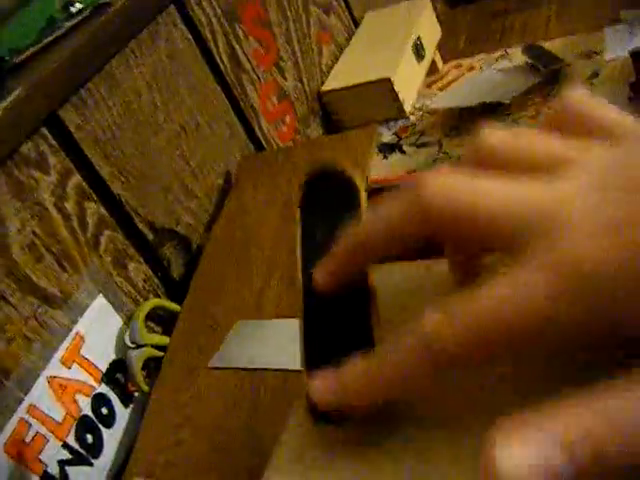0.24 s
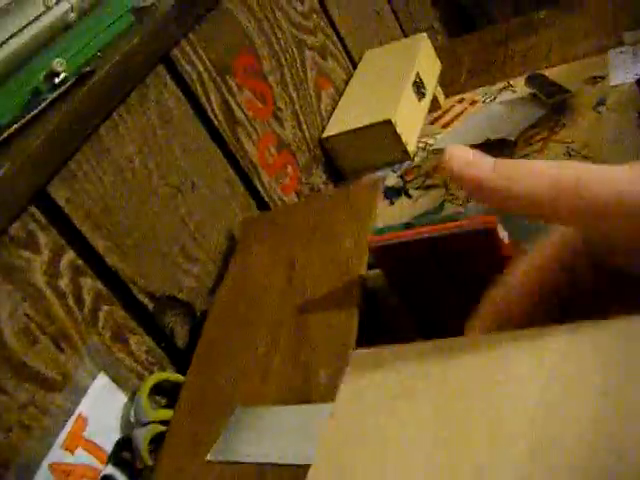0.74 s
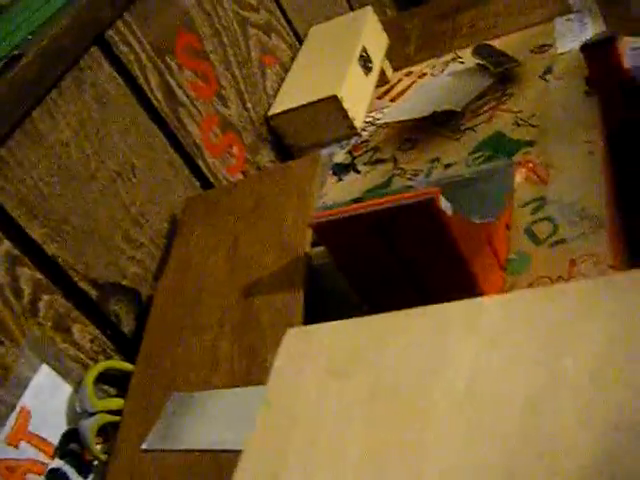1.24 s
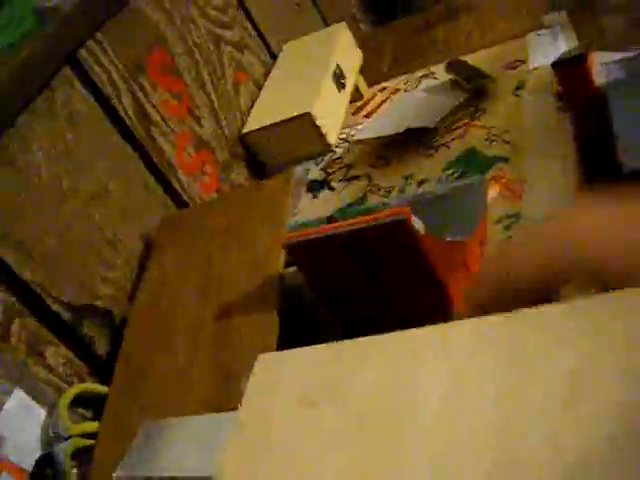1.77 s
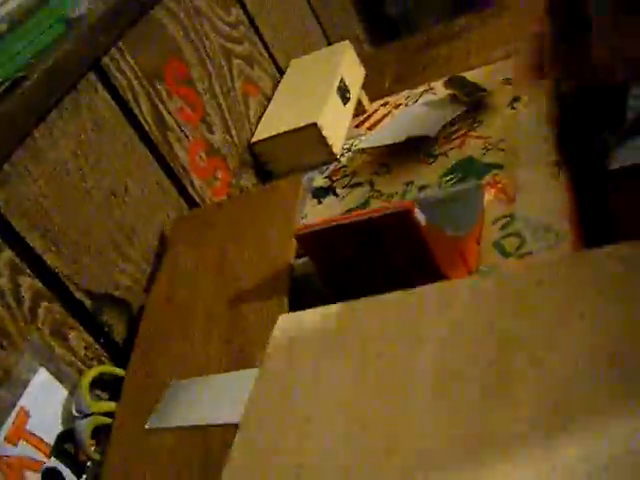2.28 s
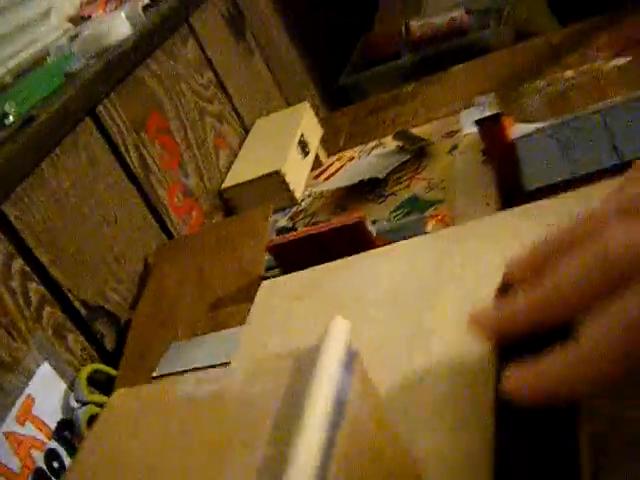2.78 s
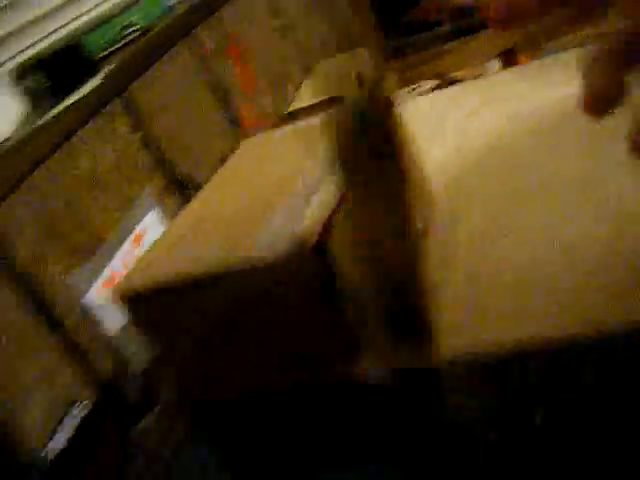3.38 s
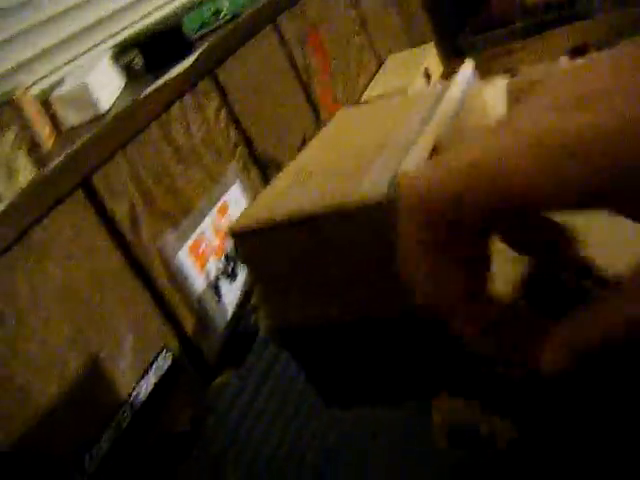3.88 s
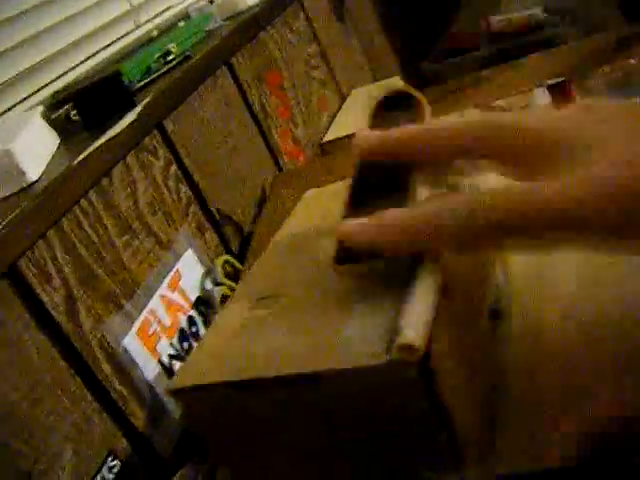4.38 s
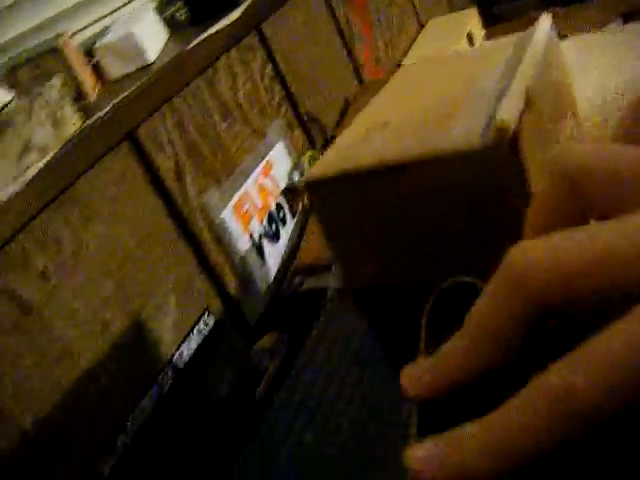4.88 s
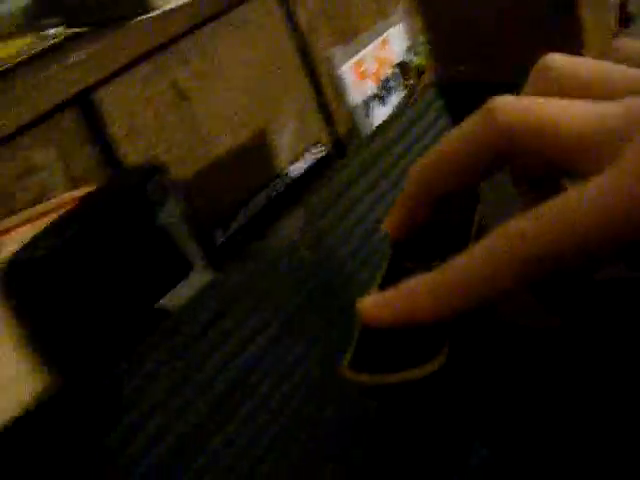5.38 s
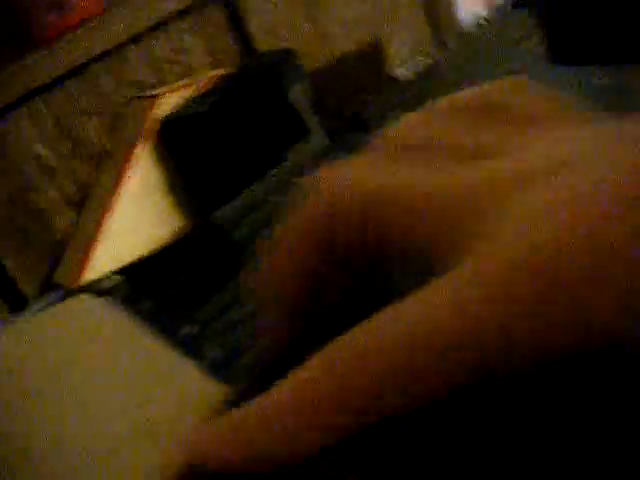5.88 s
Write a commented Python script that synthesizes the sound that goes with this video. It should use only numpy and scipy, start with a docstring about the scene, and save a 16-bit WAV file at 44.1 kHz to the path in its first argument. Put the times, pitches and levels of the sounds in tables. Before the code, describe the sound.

Close to a small camera in a small room, a finger skateboard clacks sharply, then drops and tumbles with a hollow ringing knock. Rattles thin out to near quiet, a swelling wheel rumble follows, then bursts of crisp clacks and skids on wood and box. Finally it rolls over a ribbed mat with a faint wavering tone and fuzzy drone. Hiss and low hum stay underneath.

```python
"""A toy finger skateboard clacks, skids, rolls and scrapes over a wooden table and a ribbed mat in a small room.
Contacts are noise cracks plus dying modes of deck, trucks and wood; a tumble onto a hollow thing rings its modes.
Wheels and rubbing are random grit through resonances; ribs of the mat add a wandering tone and a fuzzy drone.
Steady hiss, a low wavering hum and a thin screen whine lie under it all, close to a small camera."""
import sys
import numpy as np
from scipy import signal
from scipy.fft import rfft, irfft
from scipy.io import wavfile
from scipy.ndimage import uniform_filter1d

SR = 44100
rng = np.random.default_rng(int(sys.argv[2]) if len(sys.argv) > 2 else 0)


def pcm_store(signal):
    """Save signal as 16-bit PCM."""
    levels = np.round(np.clip(np.atleast_2d(signal), -1, 1) * 32767)
    wavfile.write(sys.argv[1], SR, levels.astype(np.int16).T)


N = 270333

# Wheels and board moving: start_s, rumble_db
ROLL_CURVE = [(0.0, -41), (0.23, -45.5), (0.55, -47.5), (0.76, -54), (0.93, -31.5), (1.11, -41.5),
              (1.24, -37.5), (1.69, -49.5), (2.01, -63), (2.53, -56), (2.656, -46.5), (2.722, -34),
              (2.888, -22.5), (3.0, -22), (3.085, -26.5), (3.11, -40.5), (3.3, -62), (4.4, -69),
              (4.498, -35.5), (4.602, -38), (4.66, -63), (4.8, -43), (5.138, -49.5), (5.38, -43.5),
              (5.494, -52), (5.618, -37), (6.026, -38.5), (6.13, -29)]
# Table resonances: centre_hz, width_hz, level_db
TABLE_MODES = [(236.4, 26, 2.5), (360, 47, 6.5), (590, 250, 9), (893, 140, 10), (1298, 260, 9.5),
               (1510, 360, 7)]
# Fingers, grip tape and axles rubbing: start_s, scrape_db, fizz_db
RUB_CURVE = [(0.03, -43, -47), (0.14, -48, -57), (0.3, -58.5, -68), (0.51, -54, -55), (0.74, -41, -41),
             (1.08, -37, -42), (1.25, -55.5, -84), (1.39, -43, -42), (1.77, -58, -83), (1.98, -67, -60),
             (2.12, -56, -53), (2.5, -71, -82), (2.62, -49.5, -49), (2.988, -37.5, -47.5), (3.13, -53, -60),
             (3.246, -44.5, -77), (3.45, -73, -68), (3.64, -62, -63), (3.934, -48, -65), (4.04, -58, -50),
             (4.39, -54, -59), (4.48, -38.5, -41.5), (4.64, -47.5, -43), (4.742, -39, -35),
             (4.962, -49.5, -55), (5.378, -53, -49.5), (5.672, -41, -44), (5.874, -47, -53),
             (6.056, -33.5, -36), (6.13, -50, -57)]
# Board resonances under friction: centre_hz, width_hz, gain_db
BOARD_RESONANCES = [(2300, 34, -40), (2820, 78, 0.5), (3236, 170, -3), (3870, 340, 0), (4370, 125, -0.5),
                    (5190, 770, -0.5), (6200, 1800, -4.5), (10480, 4500, -1), (11960, 840, -1),
                    (14200, 780, -2.5)]
# Background hiss, relative spectrum: frequency_hz, gain_db
HISS_SPECTRUM = [(12, -56.5), (20, -8), (43, 1.5), (101, 2.5), (138, -3.5), (277, -9), (388, -29),
                 (542, -9), (607, -13.5), (738, -17), (923, -17), (1120, -18), (4810, -29), (7950, -33),
                 (16000, -30)]
# Hum bands: centre_hz, width_hz, level_db
HUM_BANDS = [(54, 14, -50), (129, 12, -50), (383, 8, -58)]
# Short skids and chatters: start_s, length_s, thump_db, knock_db, clack_db, tick_db,
# wood_hz, board_hz (dragging part), board_ring_db (within the skid)
SKIDS = [(0.01, 0.17, -40.5, -36, -36.5, -41.5, 258, 3260, 5),
         (0.404, 0.073, -38, -41, -51, -56, 820, 2470, 3),
         (0.512, 0.11, -37.5, -37.5, -54, -55, 796, 2400, -8),
         (0.571, 0.018, -43, -21, -18.5, -36, 247, 2140, 5),
         (0.622, 0.051, -60, -35.5, -35, -33.5, 940, 2140, 6),
         (0.723, 0.036, -27.5, -28.5, -33, -31, 295, 2630, 8),
         (0.769, 0.023, -47, -20.5, -53, -46, 500, 1870, -17),
         (0.825, 0.026, -23.5, -33.5, -40, -33, 410, 2510, 18),
         (0.922, 0.041, -24, -46, -30, -24.5, 567, 2480, 8), (1, 0.037, -17, -14, -24, -21, 1196, 3140, 10),
         (1.037, 0.04, -45, -23, -26.5, -32, 1110, 2770, 3),
         (1.256, 0.025, -32, -27, -31, -33, 870, 4020, 16),
         (2.55, 0.03, -41, -25, -27, -29, 930, 1900, -18), (3.134, 0.01, -30, -33, -54, -44, 616, 2560, -2),
         (3.177, 0.053, -49, -36, -33, -36, 368, 1960, 13),
         (3.5, 0.13, -51, -33, -29, -27.5, 430, 2120, 11.5),
         (3.602, 0.062, -49, -48, -35, -40, 1130, 2130, 14),
         (3.633, 0.14, -57, -57, -45.5, -49, 1100, 2140, 9),
         (3.775, 0.033, -58, -43, -36, -36, 567, 2120, 13),
         (3.913, 0.076, -45, -40.5, -33, -37, 1210, 5130, 5),
         (4.416, 0.048, -21, -55, -27.5, -24.5, 710, 2540, -5),
         (4.588, 0.017, -31.5, -48, -39, -44, 776, 3000, 3),
         (4.774, 0.075, -58, -35, -51, -40, 1180, 2040, 11),
         (4.879, 0.051, -64, -29, -28, -31, 850, 2010, 3),
         (5.208, 0.08, -45, -36.5, -33, -28.5, 990, 2520, 7),
         (5.845, 0.022, -29.5, -31, -28.5, -27, 448, 3100, 8),
         (5.884, 0.058, -43, -34, -32, -43, 507, 3760, 22),
         (5.94, 0.071, -32.5, -30.5, -51, -56, 565, 3460, 11),
         (6.006, 0.032, -29, -22.5, -51, -54, 820, 1790, 2)]
# Clacks of the board: start_s, thump_db, knock_db, clack_db, tick_db,
# wood_hz (struck wood), touch_hz (touched part of the board), rattle_t60_s
CLACKS = [(0.011, -20, -12, -8.5, -5.5, 1340, 3500, 0.023),
          (0.571, -21.5, -24, -15, -10.5, 237, 5800, 0.069), (0.704, -62, -60, -38, -24, 277, 4630, 0.031),
          (0.744, -40, -27, -21, -35, 547, 3700, 0.072), (0.761, -9, -13, -19.5, -15.5, 506, 1750, 0.014),
          (0.774, -30, -40, -28.5, -45, 415, 2640, 0.1), (0.905, -17, -12, -37, -34, 570, 1570, 0.0095),
          (0.935, -20.5, -21.5, -27, -40, 650, 4480, 0.018),
          (0.961, -30, -37, -30.5, -25.5, 460, 4540, 0.11), (1.008, -21.5, -26, -21, -27, 538, 4240, 0.046),
          (1.012, -38, -20.5, -43, -38, 1086, 1690, 0.091), (1.021, -17, -25, -23, -25, 470, 1690, 0.012),
          (1.044, -31, -41, -36, -30, 460, 3600, 0.042), (1.053, -23, -39, -37, -22, 462, 2880, 0.037),
          (1.122, -35, -41, -37.5, -29, 460, 3650, 0.047), (1.163, -30, -28, -36.5, -35, 506, 3700, 0.056),
          (1.196, -46, -39, -35.5, -35, 400, 3750, 0.12), (1.262, -36, -22.5, -32.5, -47, 1390, 3700, 0.12),
          (1.31, -29, -25.5, -31, -32, 924, 4430, 0.056), (1.343, -25, -26, -35, -33, 1012, 4640, 0.049),
          (1.361, -19, -14, -20.5, -25.5, 723, 1560, 0.033),
          (1.456, -30.5, -27.5, -29.5, -28.5, 235, 4200, 0.073),
          (1.573, -35, -28, -37, -33, 1480, 4000, 0.18), (1.635, -47, -39, -37.5, -40, 1370, 4100, 0.11),
          (1.661, -37, -35, -44, -46, 1442, 3800, 0.14), (1.788, -64, -45, -47, -48, 391, 3160, 0.14),
          (1.978, -47, -44, -32.5, -24, 223, 4610, 0.14), (2.046, -57, -73, -44, -40, 375, 4770, 0.13),
          (2.063, -66, -60, -37, -31.5, 395, 4730, 0.059), (2.195, -57, -64, -48, -49, 220, 4680, 0.089),
          (2.485, -17, -18.5, -18.5, -22, 232, 4980, 0.05), (2.556, -50, -29, -40, -23, 1080, 1850, 0.017),
          (2.568, -31, -19, -18.5, -15, 1010, 3900, 0.021), (2.618, -46, -52, -32.5, -25, 256, 3550, 0.05),
          (2.659, -22, -21, -13, -11, 1040, 3630, 0.024), (2.907, -44, -34, -33, -40, 1020, 1850, 0.19),
          (2.944, -41, -30, -23.5, -33.5, 990, 1760, 0.034), (2.994, -40, -26, -33.5, -52, 761, 2950, 0.12),
          (3.147, -44, -29.5, -24.5, -22, 1300, 4740, 0.053),
          (3.177, -21.5, -20.5, -15, -11, 364, 7050, 0.049), (3.229, -64, -47, -30, -22, 350, 4800, 0.067),
          (3.291, -55, -49, -43, -38.5, 387, 4700, 0.15), (3.467, -37, -19.5, -7, -10, 1154, 3720, 0.017),
          (3.5, -28.5, -22.5, -14.5, -13, 454, 2240, 0.03),
          (3.506, -42, -26, -21, -14.5, 1155, 3540, 0.021), (3.534, -34, -48, -39, -31, 450, 2230, 0.046),
          (3.546, -27.5, -40, -13.5, -11, 380, 6170, 0.028),
          (3.559, -46, -29, -16, -10.5, 754, 3650, 0.015), (3.576, -45, -47, -19, -21, 433, 6150, 0.062),
          (3.589, -56, -54, -27, -27, 640, 6750, 0.055), (3.739, -38.5, -30.5, -32, -32, 1140, 4070, 0.11),
          (3.77, -46, -35.5, -27.5, -31, 578, 6000, 0.073), (3.838, -48, -46, -33, -24, 356, 4200, 0.036),
          (3.881, -48.5, -43, -35, -35, 207, 3630, 0.24), (3.914, -51, -64, -47, -32.5, 630, 5010, 0.052),
          (4.002, -34.5, -24.5, -17.5, -12.5, 1147, 3800, 0.048),
          (4.05, -54, -49, -33, -24.5, 1100, 5000, 0.078), (4.103, -49, -64, -47, -47, 363, 5000, 0.039),
          (4.143, -58.5, -67, -41, -32.5, 256, 5040, 0.096),
          (4.182, -78, -75.5, -42, -37, 361, 5000, 0.078), (4.244, -65, -67, -45, -43, 199, 4910, 0.13),
          (4.274, -64, -65, -40.5, -28, 217, 4700, 0.083),
          (4.408, -11.5, -20, -11.5, -10, 620, 4300, 0.018), (4.417, -30, -17, -34, -20, 835, 5910, 0.022),
          (4.433, -23, -24, -25.5, -19.5, 610, 3580, 0.04),
          (4.534, -30.5, -39, -27.5, -33, 360, 3000, 0.03), (4.609, -33, -38, -26, -19.5, 820, 6400, 0.068),
          (4.687, -38, -29.5, -15.5, -11, 1200, 3800, 0.016),
          (4.725, -25.5, -26, -28, -20, 662, 5530, 0.027), (4.738, -49, -41, -15.5, -9.5, 288, 6300, 0.027),
          (4.752, -33, -23.5, -20, -15, 1165, 6730, 0.071),
          (4.777, -27, -23.5, -19.5, -18, 431, 2070, 0.083), (4.955, -52, -53, -53, -39, 860, 2630, 0.057),
          (5.024, -42, -34, -34.5, -38, 1060, 2700, 0.017),
          (5.154, -44, -35, -40.5, -52, 1160, 2070, 0.038), (5.212, -45, -31.5, -30.5, -28, 880, 1970, 0.1),
          (5.368, -55, -47, -54, -39.5, 840, 1770, 0.11), (5.408, -37, -30, -35, -30, 855, 3740, 0.044),
          (5.475, -56, -52, -57, -36, 765, 1990, 0.059), (5.514, -44, -52, -36, -33, 880, 2220, 0.035),
          (5.61, -41, -44, -32, -28, 709, 2150, 0.053), (5.687, -35, -35, -31.5, -25, 700, 2460, 0.086),
          (5.715, -59, -32, -30, -34, 860, 1990, 0.061), (5.764, -37, -28.5, -31.5, -27, 818, 2492, 0.086),
          (5.833, -26, -26, -32.5, -36, 267, 3550, 0.063), (5.87, -34, -37, -27.5, -33, 452, 3200, 0.041),
          (5.905, -52, -44, -27.5, -31, 1160, 3910, 0.026), (5.931, -33, -30.5, -27, -31, 532, 3730, 0.12),
          (5.98, -29, -27, -30, -29, 490, 5560, 0.086), (6.001, -46, -18.5, -15, -18.5, 1159, 1710, 0.068),
          (6.036, -49, -25, -30, -24.5, 1156, 2360, 0.04), (6.071, -36, -44, -27.5, -29, 550, 1880, 0.023),
          (6.1, -49, -25, -31.5, -34.5, 612, 4500, 0.029)]
# Thump, knock, clack and tick bands: low_hz, high_hz
CONTACT_BANDS = [(110, 600), (600, 1900), (1900, 7300), (7300, 16000)]
# Deck and truck modes: pitch_hz, level_db, t60_s (before the extra fade of each clack)
DECK_MODES = [(560, -8, .05), (1114, -5, .06), (1780, -3, .06), (2200, -3, .12), (2620, -5, .05),
              (3430, 0, .045), (4050, -3, .05), (4620, -3, .035), (5146, -3, .05), (6230, -2, .06)]
# Bounces on the hollow thing: start_s, level_db (of the 0 dB mode), brightness_db_per_octave
BOUNCES = [(1.051, -12.5, -5), (1.06, -20, 7), (1.12, -13, -2), (1.165, -21, 0), (1.197, -24.5, 6.5),
           (1.265, -33.5, 9.5), (1.454, -39.5, 11.5), (1.569, -42.5, 10.5), (1.608, -46, 3),
           (1.662, -47, 9)]
# Hollow thing's modes: pitch_hz, level_db, t60_s
HOLLOW_MODES = [(237, -15, .1), (463, 0, .19), (926, -10, .12), (1436, -11, .11), (1478, -14, .1),
                (2745, -28, .08), (3600, -22, .05)]
# Wheels singing on the ribs: start_s, pitch_hz, level_db
SING_CURVE = [(5.12, 785, -90), (5.18, 788.6, -43), (5.205, 815.7, -47), (5.225, 824, -31),
              (5.255, 815.4, -26.5), (5.28, 832, -44), (5.305, 808, -35.5), (5.395, 798, -44),
              (5.41, 793, -29), (5.418, 781, -44), (5.433, 779, -24), (5.447, 747, -39),
              (5.465, 762.6, -26), (5.495, 752, -27), (5.51, 785, -37), (5.52, 801, -25),
              (5.555, 772, -37.5), (5.57, 775, -28), (5.612, 790, -48), (5.64, 809, -30), (5.67, 753, -24),
              (5.69, 755, -33), (5.715, 825.5, -22), (5.745, 758, -40), (5.84, 787, -34.5), (5.9, 820, -90)]
# Overtones of the singing: pitch_hz, level_db (against the tone)
SING_OVERTONES = [(1620, -28.), (2050, -19.), (2490, -19.)]
# Higher, fuzzier note of the same wheels: start_s, level_db, pitch_hz
DRONE_CURVE = [(4.9, -72, 1120), (4.94, -53, 1130), (5.09, -50, 1110), (5.155, -38.5, 1090),
               (5.3, -55, 997), (5.42, -44, 1036), (5.63, -41, 1020), (5.83, -33.5, 1180),
               (5.89, -39, 1182), (6.02, -36, 1157), (6.13, -40, 1160)]
# Room decay: frequency_hz, t60_s
ROOM_DECAY = [(200, 0.31), (1000, 0.16), (4000, 0.16), (12000, 0.12)]

RUMBLE_TOP_HZ, GRAIN_DB = 1500, -18.5  # grain: finer part above the rumble, against it
# Hollow boom: level at the reference rumble, and its share of every change
BOOM_DB, BOOM_REFERENCE_DB, BOOM_SHARE = -45.5, -37.5, 0.53
MAT_START_S, MAT_FADE_S, MAT_DAMPS_DB = 4.75, 0.062, -7.5  # mat damps the boom
DECK_HUM_HZ, DECK_HUM_WIDTH_HZ, DECK_HUM_DB = 2170, 220, -14  # loose deck, against the scrape
HISS_DB, WHINE_HZ, WHINE_DB = -48.5, 15735, -63
FULL_BLOW_S = 0.0016  # after the first touch
TOUCH_RATTLE_DB, TOUCH_WIDTH_HZ = -6, 340  # touched part's own rattle
TOUCH_DB_PER_OCTAVE, TOUCH_SPREAD_DB = -13., 2  # drop away from the touched pitch; random unevenness
DECK_RING_DB, WOOD_RING_DB = -6., -4.5  # within the clack
ROOM_DB = -12.0
# Dead spot of the microphone port, with a narrow core
NOTCH_HZ, NOTCH_WIDTH_HZ, NOTCH_DB, SLIT_WIDTH_HZ, SLIT_DB = 7855, 1080, -7.5, 220, -12.5
EDGE_HZ, LEAK_EDGE_HZ, LEAK_DB = 15900, 16900, -22.0


def gain_of(db):
    """Decibels to gain."""
    return 10 ** (np.asarray(db) / 20)


def evened(x):
    """Scales to rms 1."""
    return x / np.sqrt(np.mean(x ** 2) + 1e-20)


def read(points, hz):
    """Reads a spectrum table on a log-frequency axis."""
    f, value = np.transpose(points)
    return np.interp(np.log(hz + 1), np.log(f + 1), value)


def curves(rows):
    """Interpolates each column of curve rows over the whole scene."""
    s, *columns = np.transpose(rows)
    return [np.interp(np.arange(N) / SR, s, column) for column in columns]


def add(mix, start_s, sound):
    """Mixes a sound in at its start, cut at the scene's end."""
    part = mix[round(max(start_s, 0) * SR):][:len(sound)]
    part += sound[:len(part)]


def band(x, low_hz, high_hz):
    """Causal band-pass."""
    sos = signal.butter(3, [low_hz, high_hz], "bandpass", fs=SR, output="sos")
    return signal.sosfilt(sos, x)


def peak(x, hz, width_hz):
    """A fixed resonance of gain 1."""
    return signal.lfilter(*signal.iirpeak(hz, hz / width_hz, SR), x)


def resonate(x, hz, width_hz):
    """Movable resonance of gain 1: shifts hz down to zero, smooths, shifts back."""
    turn = np.exp(2j * np.pi * np.cumsum(hz * np.ones(len(x))) / SR)
    r = np.exp(-np.pi * width_hz / SR)
    smooth = signal.lfilter([1 - r], [1, -r], x / turn + 1e-18)
    return 2 * (turn * smooth).real


def grit(per_s, spread_db):
    """Sparse random impulses of uneven size."""
    size = gain_of(spread_db * np.minimum(rng.exponential(1, N), 4))
    return evened(size * rng.standard_normal(N) * (rng.random(N) < per_s / SR))


def ring(modes, extra_db, t):
    """Exponentially dying sines, one a mode."""
    return sum(gain_of(db + more - 60 * t / t60) * np.sin(2 * np.pi * hz * t)
               for (hz, db, t60), more in zip(modes, extra_db))


def through_board(x, plain):
    """Colours grit with the board's resonances; a plain share passes as it is."""
    out = plain * x
    for hz, width_hz, db in BOARD_RESONANCES:
        out = out + gain_of(db) * peak(x, hz, width_hz)
    return evened(out)


def add_by_band(mix, rows, sounds):
    """Splits contacts into thump, knock, clack and tick, each at its row's level (start_s, four dB)."""
    for k, (low_hz, high_hz) in enumerate(CONTACT_BANDS):
        parts = band(np.array(sounds), low_hz, high_hz)
        power = uniform_filter1d(parts ** 2, 300)
        parts = parts / np.sqrt(power.max(axis=1, keepdims=True))  # loudest short-time rms becomes 1
        for (start_s, *band_db), part in zip(rows, parts):
            add(mix, start_s, gain_of(band_db[k]) * part)


def rolling():
    """Tiny wheels bump over the grain of the wood and shake the table's resonances."""
    rumble_db, = curves(ROLL_CURVE)
    on_mat = np.clip((np.arange(N) / SR - MAT_START_S) / MAT_FADE_S, 0, 1)
    boom_db = BOOM_DB + BOOM_SHARE * (rumble_db - BOOM_REFERENCE_DB) + MAT_DAMPS_DB * on_mat
    bumps = grit(5000, 1.6)
    # alternating signs between neighbouring modes
    body = sum((-1) ** k * gain_of(db) / np.sqrt(width_hz) * resonate(bumps, hz, width_hz)
               for k, (hz, width_hz, db) in enumerate(TABLE_MODES))
    rumble = evened(band(band(body, 173, RUMBLE_TOP_HZ), 378, RUMBLE_TOP_HZ))
    grain = gain_of(GRAIN_DB) * evened(band(bumps, RUMBLE_TOP_HZ, 2360))
    boom = evened(band(body, 160, 469))
    return gain_of(rumble_db) * (rumble + grain) + gain_of(boom_db) * boom


def rubbing():
    """Fine grit under the stroke: a scrape through the board, the deck's hum and an airy fizz with stray ticks."""
    scrape_db, fizz_db = curves(RUB_CURVE)
    flicker = gain_of(2. * evened(uniform_filter1d(rng.standard_normal(N), 350)))
    grains = flicker * grit(4500, 0.93)
    tick_envelope = signal.lfilter([1], [1, -.97], np.abs(grit(72, 4.8)))
    ticks = tick_envelope * rng.standard_normal(N)
    body = through_board(grains, .15)
    scrape = evened(band(body, 2340, 9150))
    fizz = evened(band(body, 7230, 17400)) + 0.92 * evened(band(ticks, 7600, 16000))
    hum = peak(grains, DECK_HUM_HZ, DECK_HUM_WIDTH_HZ)
    hum = evened(peak(hum, DECK_HUM_HZ, DECK_HUM_WIDTH_HZ))
    return gain_of(scrape_db) * (scrape + gain_of(DECK_HUM_DB) * hum) + gain_of(fizz_db) * fizz


def room_tone():
    """Steady shaped noise, wavering narrow-band hum and a screen's whine."""
    hz, noise = np.fft.rfftfreq(N, 1 / SR), rng.standard_normal(N)
    shaped = irfft(rfft(noise) * gain_of(read(HISS_SPECTRUM, hz)), N)
    hiss = gain_of(HISS_DB) * evened(shaped)
    hum = sum(gain_of(db) * evened(peak(peak(noise[::-1], f, width_hz), f, width_hz))
              for f, width_hz, db in HUM_BANDS)
    whine = gain_of(WHINE_DB) * np.sqrt(2) * np.sin(2 * np.pi * WHINE_HZ * np.arange(N) / SR)
    return hiss + hum + whine


def skids():
    """Quick uneven slips ring the wood and the board for as long as the board drags."""
    out, t, sounds = np.zeros(N), np.arange(8000) / SR, []
    shape = (len(SKIDS), len(t))
    chance, noise = rng.random(shape), rng.standard_normal(shape)
    for (_, length_s, *_, wood_hz, board_hz, ring_db), u, hiss in zip(SKIDS, chance, noise):
        drag = np.clip(np.minimum(t / 0.003, (length_s - t) / (0.27 * length_s)), 0, 1)
        # 500 slips a second, each a puff decaying in under a millisecond
        slips = signal.lfilter([1], [1, -.96], 1. * (u < 500 / SR))
        grains = drag * hiss * (0.5 + slips)
        rasp = through_board(grains, .4)
        wood = gain_of(8.5) * peak(grains, wood_hz, 170.0)
        board = gain_of(ring_db) * peak(grains, board_hz, 107.0)
        sounds.append(rasp + (wood + board) / np.sqrt(np.mean(grains ** 2)))
    add_by_band(out, [(start_s, *rest) for start_s, _, *rest in SKIDS], sounds)
    return out


def clacks():
    """A faint first touch, a sharp blow, a short rattle, the modes of deck and trucks and the wood underneath."""
    out, t, sounds = np.zeros(N), np.arange(6000) / SR, []
    noise = rng.standard_normal((len(CLACKS), len(t)))
    luck = rng.standard_normal((len(CLACKS), len(DECK_MODES)))
    after = np.maximum(t - FULL_BLOW_S, 0)
    struck = np.where(after > 0, 1, .12)
    blow = (after > 0) * sum(size * (1 - after / s) * np.exp(-after / s)
                             for size, s in [(2.2, 0.00031), (4., 0.000013)])
    rattles = through_board(noise, .35)
    deck_hz = np.transpose(DECK_MODES)[0]
    for (*_, wood_hz, touch_hz, t60), hiss, rattle, weights in zip(CLACKS, noise, rattles, luck):
        t60 = max(t60, .005)
        touched = evened(peak(hiss, touch_hz, TOUCH_WIDTH_HZ))
        rattle = gain_of(-4.0) * rattle + gain_of(TOUCH_RATTLE_DB) * touched
        burst = hiss * gain_of(-60 * after / 0.012) + rattle * gain_of(-60 * after / t60)
        crack = blow + struck * burst
        # modes far from the touched part stay quieter
        woken_db = TOUCH_SPREAD_DB * weights + TOUCH_DB_PER_OCTAVE * abs(np.log2(deck_hz / touch_hz))
        deck = gain_of(DECK_RING_DB - 30 * after / t60) * ring(DECK_MODES, woken_db, after)
        wood = ring([(wood_hz, WOOD_RING_DB, 1.43 * t60)], [0], after)
        loose = 1 + .5 * evened(uniform_filter1d(hiss, 120))  # loose parts make the rings flutter
        sounds.append(crack + loose * (deck + wood))
    add_by_band(out, CLACKS, sounds)
    return out


def bounces():
    """Each bounce feeds the ringing of the hollow thing; harder contact wakes its upper modes."""
    out, t = np.zeros(N), np.arange(14000) / SR
    octaves = np.log2(np.transpose(HOLLOW_MODES)[0] / HOLLOW_MODES[1][0])
    for start_s, db, bright_db in BOUNCES:
        # phase runs on scene time, shared by all bounces
        modes = sum(gain_of(mode_db + bright_db * up - 60 * t / t60) * np.sin(2 * np.pi * hz * (start_s + t))
                    for (hz, mode_db, t60), up in zip(HOLLOW_MODES, octaves))
        add(out, start_s, gain_of(db) * modes * np.minimum(t / 0.0027, 1))
    return out


def singing():
    """Ribs of the mat drive a narrow swelling tone with fuzzy overtones, and a rougher note above it."""
    tone_hz, tone_db = curves(SING_CURVE)
    drone_db, drone_hz = curves(DRONE_CURVE)
    ribs = rng.standard_normal(N)
    sine = np.sqrt(2) * np.sin(2 * np.pi * np.cumsum(tone_hz) / SR)
    tone = sine + 0.66 * evened(resonate(ribs, tone_hz, 32.0))
    upper = sum(gain_of(db) * evened(peak(peak(ribs, hz, 80.), hz, 80.)) for hz, db in SING_OVERTONES)
    drone = evened(resonate(resonate(ribs, drone_hz, 110.0), drone_hz, 105.0))
    swell = gain_of(tone_db)
    return swell * tone + uniform_filter1d(swell, 2000) * upper + gain_of(drone_db) * drone


def room(x):
    """Sparse echoes of random sign, each band dying at its own speed."""
    taps = np.zeros(SR // 2)
    at = np.arange(200, SR // 2 - 20, 20)
    taps[at + rng.integers(0, 20, len(at))] = rng.choice([-1., 1.], len(at))
    hz, t, z = signal.stft(taps, SR, nperseg=256)
    t60 = np.maximum(read(ROOM_DECAY, hz), .02)[:, None]
    tail = signal.istft(z * gain_of(-60 * t / t60), SR, nperseg=256)[1]
    return signal.fftconvolve(x, tail / np.linalg.norm(tail))[:N]


def scene():
    """Contacts with their room echo, plus motion sounds and background."""
    moving = rolling() + rubbing()
    background = room_tone()
    hits = skids() + clacks() + bounces()
    return (hits + gain_of(ROOM_DB) * room(hits) + moving + singing() + background)[None]


def record(dry):
    """The port's dead spot, soft overload, then the band limit with a faint shelf above it."""
    hz = np.fft.rfftfreq(N, 1 / SR)
    port_db = sum(db / (1 + ((hz - NOTCH_HZ) / width_hz) ** 2)
                  for db, width_hz in [(NOTCH_DB, NOTCH_WIDTH_HZ), (SLIT_DB, SLIT_WIDTH_HZ)])
    heard = irfft(rfft(dry) * gain_of(port_db), N)
    heard = .92 * np.tanh(heard / .92)
    edge, leak = (signal.firwin(511, f, window=("kaiser", 12), fs=SR) for f in (EDGE_HZ, LEAK_EDGE_HZ))
    share = gain_of(LEAK_DB)
    return signal.oaconvolve(heard, ((1 - share) * edge + share * leak)[None], "same")


dry = scene()
out = record(dry)
pcm_store(out)
```